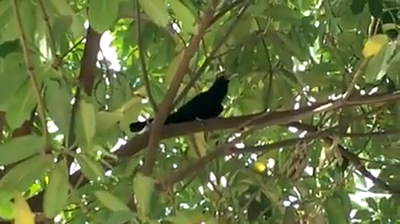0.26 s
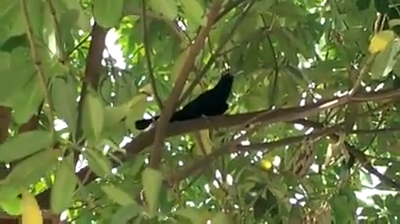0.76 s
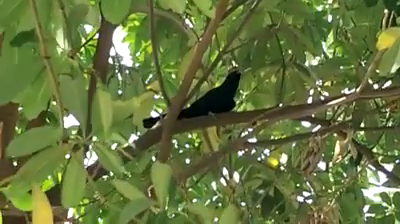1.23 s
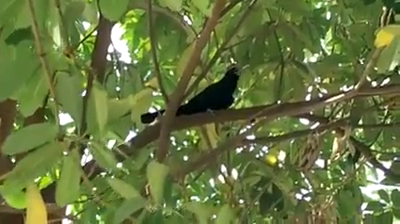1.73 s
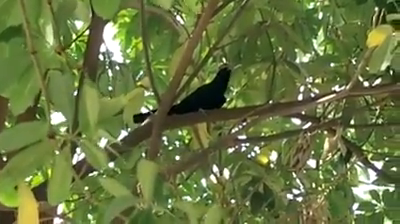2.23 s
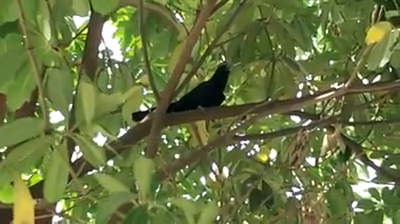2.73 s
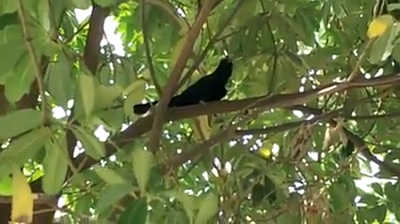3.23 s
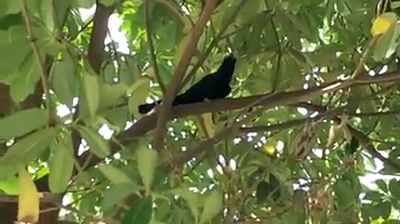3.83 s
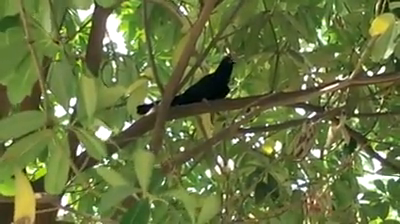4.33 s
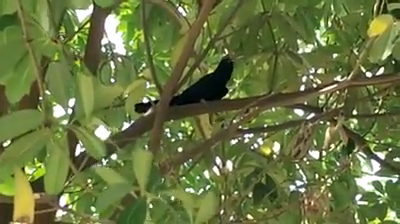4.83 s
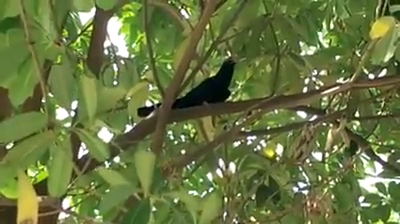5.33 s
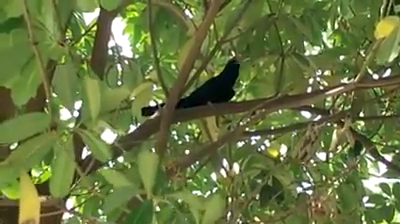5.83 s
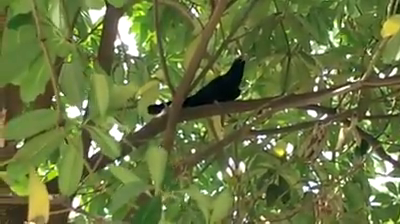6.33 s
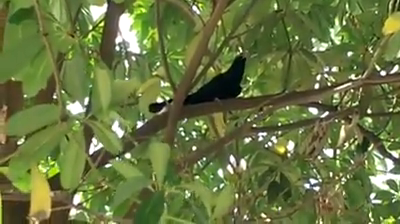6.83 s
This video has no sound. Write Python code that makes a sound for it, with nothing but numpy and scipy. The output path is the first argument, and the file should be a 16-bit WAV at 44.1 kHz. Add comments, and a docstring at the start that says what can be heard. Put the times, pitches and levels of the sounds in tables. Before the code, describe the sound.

A black koel perched in a leafy tree gives five loud whistles, evenly spaced with pauses of about a second. Each dips, slides upward, then falls fast. Successive calls reach slightly higher; the third roughens at its peak and the last two crack harshly. Leaves and nearby walls return a scattered, fading echo. Behind lies a quiet, low traffic rumble with a wavering machine hum. The bird is fairly close to a stereo microphone outdoors.

```python
"""Among town buildings, a large cuckoo whistles five times from a tree: a dip, a rising slide, a fast fall.
The whistle is a gliding sine with weak overtones; noise in several bands roughens the third
call from its top and cracks the last two. Walls and leaves answer with fading, scattered noise echoes.
Behind it, filtered noise is the town's rumble, wavering sines are a machine's hum and faint tones,
and narrow bands of noise are a faint shrill sound."""
import sys
import numpy as np
from scipy import signal
from scipy.fft import rfft, irfft, next_fast_len
from scipy.io import wavfile
from scipy.ndimage import uniform_filter1d, minimum_filter1d, map_coordinates

SR = 44100
rng = np.random.default_rng(int(sys.argv[2]) if len(sys.argv) > 2 else 0)


def file_out(sig):
    """Save sig as 16-bit WAV at sys.argv[1]."""
    # one column per channel
    cols = np.atleast_2d(sig).T
    # limit, then scale
    lim = np.clip(cols, -1, 1)
    pcm = np.round(lim * 32767).astype(np.int16)
    wavfile.write(sys.argv[1], SR, pcm)


def boost(x):
    """Linear amplitude factor 10**(x/20) for a level x in decibels (scalar or array-like)."""
    u = np.asarray(x, float) / 20
    return 10 ** u


N = 311778  # samples in the scene

# the five calls: start_s, slide_middle_s, top_reached_s, fall_begins_s, end_s, dip_hz, top_hz
CALLS = [(0.153, .426, .5, 0.53, 0.64, 1274, 1713), (1.535, 1.813, 1.886, 1.912, 2.027, 1319, 1769),
         (2.923, 3.187, 3.26, 3.29, 3.407, 1335, 1802), (4.526, 4.794, 4.869, 4.905, 5.006, 1331, 1840),
         (5.901, 6.159, 6.229, 6.278, 6.35, 1377, 1850)]
# the shape all calls share: stage (0-4 along those five moments), height (pitch: 0 = dip, 1 = top),
# level_db, second_overtone_db, higher_overtones_db (before the changes for how high the call reaches)
CALL_SHAPE = [(0, -0.517, -52, -52, -78), (.048, .22, -28.5, -27, -60.5), (0.111, .45, -18.5, -43, -45),
              (.27, .1, -21, -55, -45.5), (.46, 0, -19, -46.5, -49), (0.659, .03, -18.5, -49, -47),
              (.83, .14, -17, -45.5, -45), (1, .51, -14.5, -41, -42.5), (1.47, .82, -13.5, -36.5, -40),
              (2, 0.99, -14, -34, -37.5), (3, 0.99, -17, -34.5, -45.5), (3.24, .54, -17.5, -41, -40.5),
              (3.6, -.23, -22, -48.5, -52.5), (4, -1.03, -52, -65.5, -78.5)]
# higher overtones of the voice: multiple (of the pitch), level_db (relative)
VOICE_OVERTONES = [(3, -5.5), (4, 0.35), (5, -3.5), (6, -11.5), (7, -10.5), (8, -14), (9, -19), (10, -20),
                   (11, -27.5)]
# strength of those overtones by frequency: frequency_hz, change_db
OVERTONE_STRENGTH = [(3900, -2.2), (4800, -4.5), (5500, 6), (7000, -6), (8000, -15), (9200, -2.5),
                     (10200, -16.5), (11500, -4.5), (13500, 7.5), (15500, -3.5)]
# nearest echoes interfere with the straight whistle: pitch_hz, left_db, right_db, left_lead_rad
NEAREST_ECHOES = [(1275, 1.5, 1.5, 7.5), (1327, 1.5, 1, 8), (1323, -1, 4, 7.5), (1375, 2.5, 3, 7),
                  (1446, -9.5, -15.5, 8), (1477, 4, -4.5, 3.5), (1540, -11, 0, 5), (1562, 10.5, 9.5, 2.13),
                  (1653, -2.5, 1.5, -0.7), (1673, -9, -6.5, 0.75), (1726, 0.5, 1.5, 0), (1787, -1, 0, -2),
                  (1850, -1.5, -1.5, -1)]
# where the voice turns rough and bursts: from_s, to_s, rough_db, burst_s, burst_db
ROUGH_SPOTS = [(3.263, 3.37, -48, 3.33, -47), (4.854, 4.986, -50, 4.9, -19),
               (6.213, 6.33, -33, 6.28, -19.5)]
# noise bands that make the rasp, some near one and a half times the whistle's pitch:
# frequency_hz, width_hz, level_db (relative)
RASP_BANDS = [(1960, 880, 0.5), (2400, 190, 7.5), (2740, 113, 4.5), (3400, 460, -8), (4310, 230, -8)]
# time for echoes to fade by 60 dB, for leaves, near scatter and far tail: frequency_hz, fade_s
LEAVES_FADE = [(3000, 0.12), (12000, 0.097)]
NEAR_FADE = [(800, 0.33), (1500, 0.5), (4000, 0.65), (8000, 0.48), (14000, 0.3)]
FAR_FADE = [(800, 1.02), (1700, 1.52), (4000, 1.06), (8000, 0.66), (14000, 0.72)]
# colour of the town rumble: frequency_hz, level_db (relative, per Hz)
TOWN_COLOUR = [(12, -66.5), (20, -17), (65, -5), (103, -6.5), (123, -4.5), (244, -8.5), (274, -11.5),
               (452, -16), (495, -17.5), (1200, -23), (1440, -20.5), (1770, -21.5), (3660, -34),
               (4600, -51), (5980, -94), (10100, -120)]
# how alike the rumble is on both sides: frequency_hz, likeness (0-1)
TOWN_LIKENESS = [(30, 0.95), (80, 0.99), (200, 0.98), (400, 0.71), (800, 0.35), (2000, 0.024)]
# how much louder the rumble is on the left: frequency_hz, left_minus_right_db
TOWN_LEAN = [(60, 0.5), (240, -2), (950, -1.0), (3770, -0.5), (15000, -10)]
# machine hum, swelling and fading: time_s, level_db
HUM_LEVEL = [(0.0, -52.5), (0.53, -51), (2.32, -60), (2.5, -46.5), (3.27, -50), (3.33, -62), (4.25, -52.5),
             (4.37, -66), (4.43, -50.5), (6.18, -54.5), (6.26, -73), (6.34, -48.5), (6.99, -47.5),
             (7.07, -55)]
# faint higher tone: time_s, level_db
TONE_LEVEL = [(0, -71.5), (4.7, -64.5), (5.1, -58), (6, -62), (6.95, -61), (7.07, -76)]
# short far tones: start_s, length_s, first_hz, last_hz, level_db
FAR_BLIPS = [(5.655, .32, 247, 247.6, -54.5), (6.58, 0.11, 790, 825, -55.5), (6.893, .25, 674, 665, -59)]
# faint shrill sound that comes and goes: time_s, level_db
SHRILL_LEVEL = [(.55, -86), (.72, -54), (.95, -52.5), (1.2, -59.5), (1.45, -66)]

# a call that reaches higher has stronger overtones, and runs out of air sooner in the fall
USUAL_TOP_HZ, BRIGHTER_DB_PER_KHZ, FALL_FADES_DB_PER_KHZ = 1801, 20.5, 70
ROUGH_EDGE_DB_PER_S, BURST_RISE_DB_PER_S, BURST_FALL_DB_PER_S = 1501, 421, 652
TOWN_LOW_DB, TOWN_MIDDLE_DB, TOWN_SPLIT_HZ = -51, -52.5, 400
SWELL_S, SWELL_WIDTH_S, SWELL_DB = 5.89, 0.07, 4.5  # the upper rumble swells once, briefly
HUM_HZ, TONE_HZ = 99.1, 403
BLIP_EDGE_S, BLIP_EDGE_DB = 0.066, -16


def unit(x):
    """Scale to an average strength (rms) of 1."""
    return x / np.sqrt(np.mean(x ** 2) + 1e-20)


def along(points, hz):
    """Read (frequency, value) points on a log frequency axis."""
    f, v = np.transpose(points)
    return np.interp(np.log(hz + 1), np.log(f + 1), v)


def curves(rows, smooth_s=0):
    """Turn each column after the time into one value per sample, with corners rounded over smooth_s."""
    s, *cols = np.transpose(rows)
    lines = np.array([np.interp(np.arange(N) / SR, s, c) for c in cols])
    return uniform_filter1d(lines, int(smooth_s * SR) + 1, axis=1)


def wobble(rate):
    """Draw a smooth random curve through `rate` random points a second."""
    points = rng.standard_normal(int(N * rate / SR) + 4)
    return map_coordinates(points, [np.arange(N) * rate / SR])


def filtered(x, response):
    """Change the strength and phase of each frequency in x by response(hz)."""
    m = next_fast_len(N + SR // 2)
    spectrum = rfft(x, m) * response(np.fft.rfftfreq(m, 1 / SR))
    return irfft(spectrum, m)[..., :N]


def call(start_s, slide_s, top_s, fall_s, end_s, dip_hz, top_hz):
    """A gliding sine whistle: at the beak, its jittery overtones, then as it arrives left and right."""
    stage, height, *levels = np.transpose(CALL_SHAPE)
    times = np.interp(stage, np.arange(5), [start_s, slide_s, top_s, fall_s, end_s])
    pitch = dip_hz + height * (top_hz - dip_hz)
    rows = np.transpose([times, pitch, *levels])
    hz, db, second_db, upper_db = curves(rows, smooth_s=0.015)

    t = np.arange(N) / SR
    reach_khz = (top_hz - USUAL_TOP_HZ) / 1000
    fall_progress = np.clip((t - fall_s) / (end_s - fall_s), 0, 1)
    db = db - FALL_FADES_DB_PER_KHZ * reach_khz * fall_progress
    fade_in = np.clip((t - start_s) / 0.0023, 0, 1)
    fade_out = np.clip((end_s - t) / 0.013, 0, 1)
    gate = np.sqrt(2) * fade_in * fade_out  # sqrt(2): levels are rms
    on = gate > 0
    phase = 2 * np.pi * np.cumsum(hz * on) / SR
    shaky = phase + 0.11 * wobble(240)  # cycle jitter blurs high overtones most

    upper = np.zeros(N)
    for k, level in VOICE_OVERTONES:
        overtone_hz = k * hz[on]
        strength = boost(level + along(OVERTONE_STRENGTH, overtone_hz))
        upper[on] += strength * (overtone_hz < SR / 2) * np.sin(k * shaky[on])
    upper = boost(upper_db) * upper + boost(second_db) * np.sin(2 * shaky)
    upper = upper * boost(BRIGHTER_DB_PER_KHZ * reach_khz)

    echo_hz, *columns = np.transpose(NEAREST_ECHOES)
    heard = [np.interp(hz, echo_hz, c) for c in columns]
    for _ in range(2):
        heard = uniform_filter1d(heard, 150, axis=1)
    left_db, right_db, lead = heard
    sides = boost([left_db, right_db]) * np.sin(phase + np.outer([0.5, -0.5], lead))
    return gate * np.vstack([boost(db) * np.sin(phase), upper, boost(db) * sides])


def rasp():
    """Irregular flaps of the voice membranes, made of noise shaped into several bands."""
    flaps = rng.standard_normal(N) * boost(1.6 * wobble(120))

    def noise_bands(f):
        total = 0
        for k, (centre, width, db) in enumerate(RASP_BANDS):
            band = 1j * f * width / (centre * centre - f * f + 1j * f * width)
            total = total + (-1) ** k * boost(db) * band  # neighbours have opposite signs
        return total / (1 + (f / 4600) ** 12) / (1 + (1800 / (f + 1)) ** 8)

    t, strength = np.arange(N) / SR, np.zeros(N)
    for from_s, to_s, rough_db, burst_s, burst_db in ROUGH_SPOTS:
        outside_s = np.maximum(0, np.maximum(from_s - t, t - to_s))
        burst_drop = np.maximum(BURST_RISE_DB_PER_S * (burst_s - t), BURST_FALL_DB_PER_S * (t - burst_s))
        spot_db = np.maximum(rough_db, burst_db - burst_drop)
        strength += boost(spot_db - ROUGH_EDGE_DB_PER_S * outside_s)
    return strength * unit(filtered(flaps, noise_bands))


def echoes(x, fade, delay_s):
    """Scattered echoes: each frequency of a noise tail dies at its own speed, differently on each side."""
    hz, t, z = signal.stft(rng.standard_normal((2, SR * 3 // 2)), SR, nperseg=256)
    dying = z * boost(-60 * t / along(fade, hz)[:, None])
    tail = signal.istft(dying, SR, nperseg=256)[1]
    tail = np.pad(tail, ((0, 0), (int(delay_s * SR), 0)))
    return signal.fftconvolve(x[None], tail / np.linalg.norm(tail[0]), axes=1)[:, :N]


def bird():
    """Five calls, heard straight and thrown back by leaves and walls."""
    whistle, upper, *sides = sum(call(*row) for row in CALLS)
    upper = upper + rasp()
    beak = whistle + upper
    # the tree's crown scatters the short waves
    leaves = boost(-0.5) * echoes(upper, LEAVES_FADE, delay_s=0)
    near = boost(-3.0) * echoes(beak, NEAR_FADE, delay_s=0.012)
    far = boost(-16.5) * echoes(beak, FAR_FADE, delay_s=0.03)

    def treble(hz):
        return boost(np.outer([-2.5, 2.5], hz / 10000))  # the right side faces the walls

    return np.array(sides) + filtered(leaves + near + far, treble)


def town():
    """Far traffic: patchy filtered noise, alike on both sides in the bass."""
    low_db = TOWN_LOW_DB + 1.0 * wobble(4)
    middle_db = TOWN_MIDDLE_DB + 0.65 * wobble(1.2)
    swell = np.exp(-((np.arange(N) / SR - SWELL_S) / SWELL_WIDTH_S) ** 2)
    middle_db = middle_db + SWELL_DB * swell

    z = signal.stft(rng.standard_normal((2, N)), nperseg=512)[2]
    patches = uniform_filter1d(rng.standard_normal(z.shape[1:]), 5, 0)  # smoothed over frequency
    patches = uniform_filter1d(patches, 14, 1)  # and over time
    pair = signal.istft(z * boost(1.7 * unit(patches)), nperseg=512)[1][:, :N]

    def colour_and_width(hz):
        angle = np.arccos(np.clip(along(TOWN_LIKENESS, hz), -1, 1)) / 2
        return boost(along(TOWN_COLOUR, hz)) * [np.cos(angle), np.sin(angle)]

    def lean(hz):
        return boost(np.outer([0.5, -0.5], along(TOWN_LEAN, hz)))

    mid, side = filtered(pair, colour_and_width)
    both = filtered(np.array([mid + side, mid - side]), lean)
    low = filtered(both, lambda hz: 1 / (1 + (hz / TOWN_SPLIT_HZ) ** 4))
    return boost(low_db) * unit(low) + boost(middle_db) * unit(both - low)


def drone(hz, db, waver_hz, flutter_db):
    """A sine that wavers in pitch and strength, a little late and weaker on the left."""
    phase = 2 * np.pi * np.cumsum(hz + waver_hz * wobble(16)) / SR
    strength = np.sqrt(2) * boost(db + flutter_db * wobble(12))
    return strength * np.sin(phase + [[-0.15], [0.15]]) * boost([[-0.7], [0.7]])


def machine_hum():
    """A low machine tone around a steady pitch, swelling and fading."""
    return drone(HUM_HZ, curves(HUM_LEVEL)[0], waver_hz=3.02, flutter_db=3.0)


def faint_tone():
    """A faint wavering sine, higher than the hum, that slowly changes in strength."""
    return drone(TONE_HZ, curves(TONE_LEVEL)[0], waver_hz=1.2, flutter_db=1.5)


def blip(start_s, length_s, first_hz, last_hz, db):
    """A short far tone that swells, holds and fades while its pitch glides."""
    t = np.arange(N) / SR - start_s
    from_edge_s = np.minimum(t, length_s - t)
    fade_db = BLIP_EDGE_DB * np.maximum(0, 1 - from_edge_s / BLIP_EDGE_S)
    hz = np.interp(t, [0, length_s], [first_hz, last_hz])
    return drone(hz, db + fade_db, waver_hz=1.2, flutter_db=1.5)


def shrill():
    """Two narrow bands of noise, like far insects."""
    def bands(hz):
        lower = boost(4.0) / (1 + ((hz - 3250) / 120) ** 4)
        higher = 1 / (1 + ((hz - 3650) / 130) ** 4)
        return lower + higher

    noise = rng.standard_normal((2, N))
    return boost(curves(SHRILL_LEVEL)[0]) * unit(filtered(noise, bands))


def scene():
    """Add up the bird, the town, the hum and the faint far sounds."""
    far_blips = sum(blip(*row) for row in FAR_BLIPS)
    return bird() + town() + machine_hum() + faint_tone() + far_blips + shrill()


def roll_off(x):
    """The treble ends steeply here."""
    return signal.sosfilt(signal.butter(12, 15720, fs=SR, output="sos"), x)


def record(dry):
    """A limiter smoothly turns both sides down around the highest peaks."""
    need = np.minimum(1, 0.76 / (np.abs(dry).max(axis=0) + 1e-9))
    gain = uniform_filter1d(minimum_filter1d(need, size=441), size=441)  # 441 samples = 10 ms
    return roll_off(dry * gain)


dry = scene()
out = record(dry)
file_out(out)
```